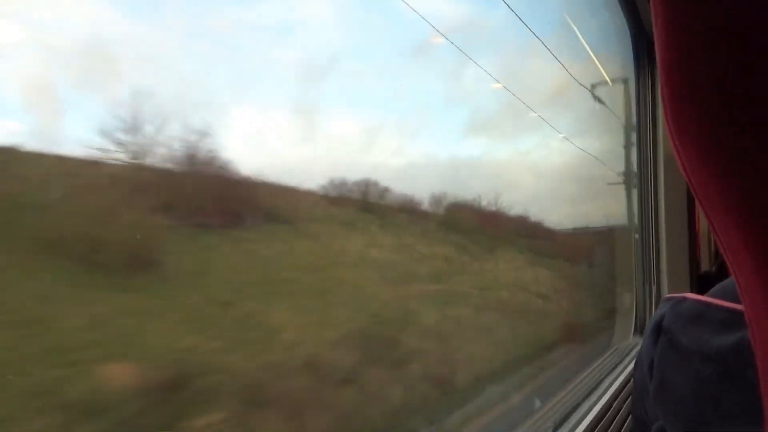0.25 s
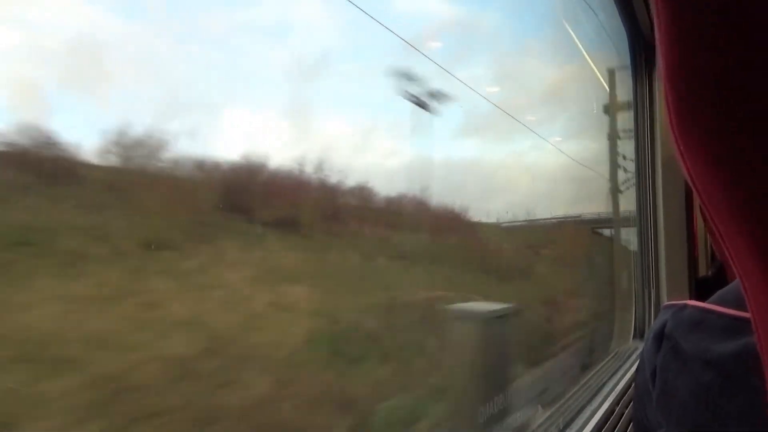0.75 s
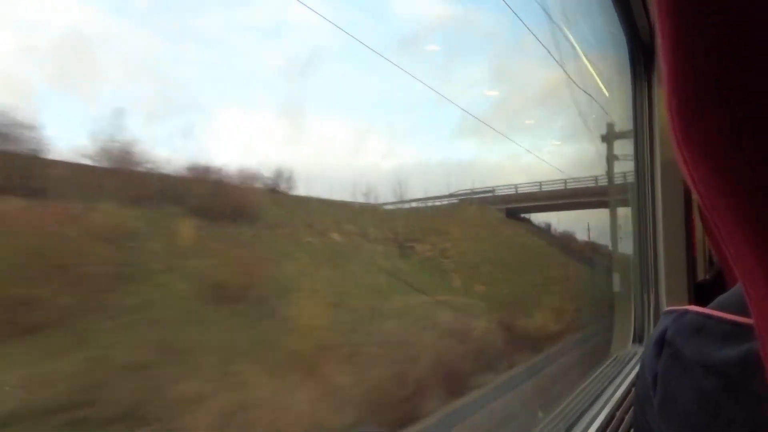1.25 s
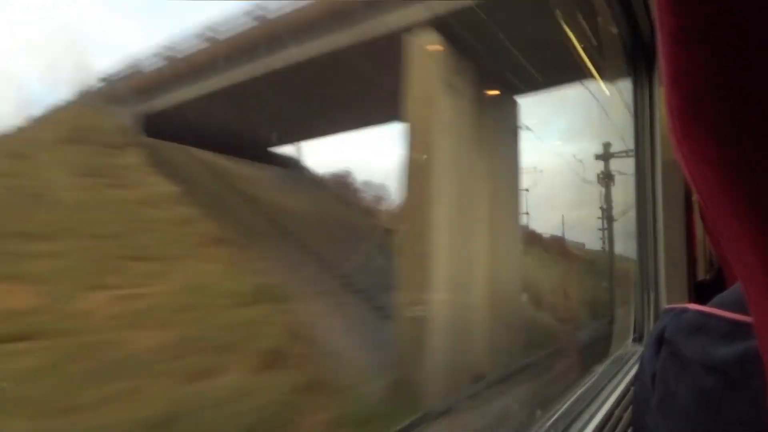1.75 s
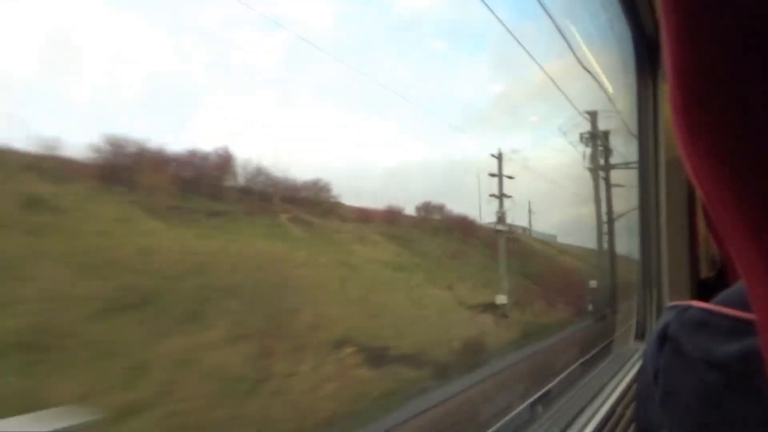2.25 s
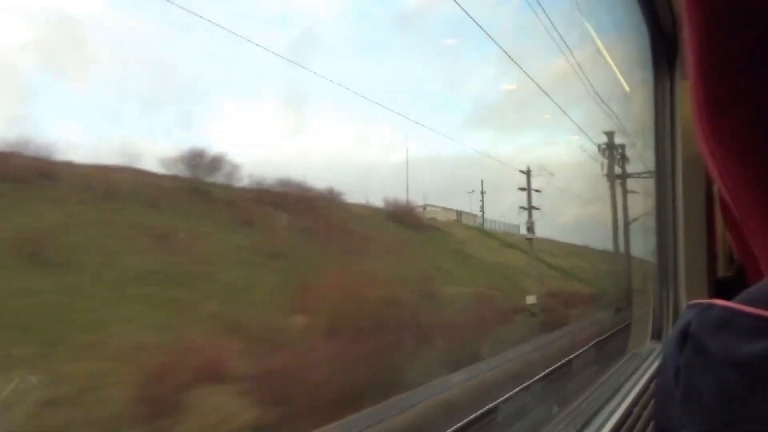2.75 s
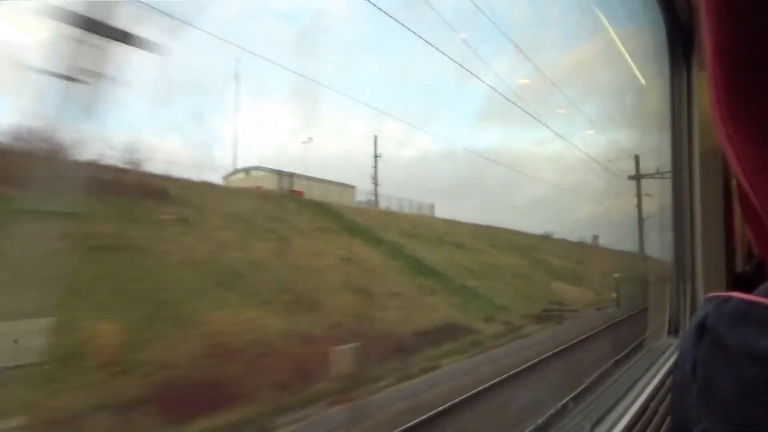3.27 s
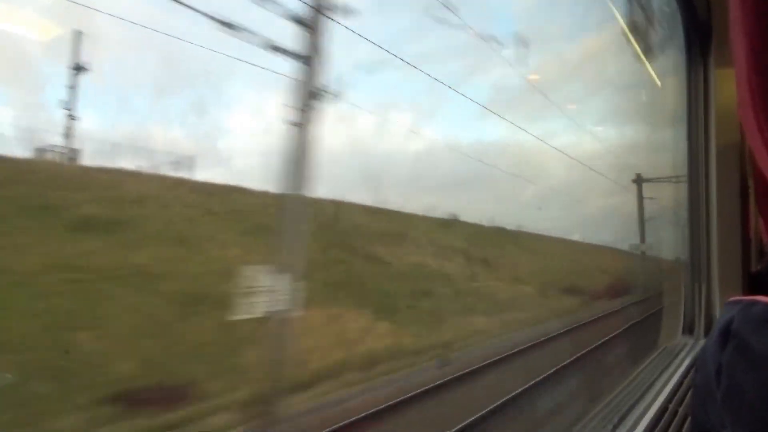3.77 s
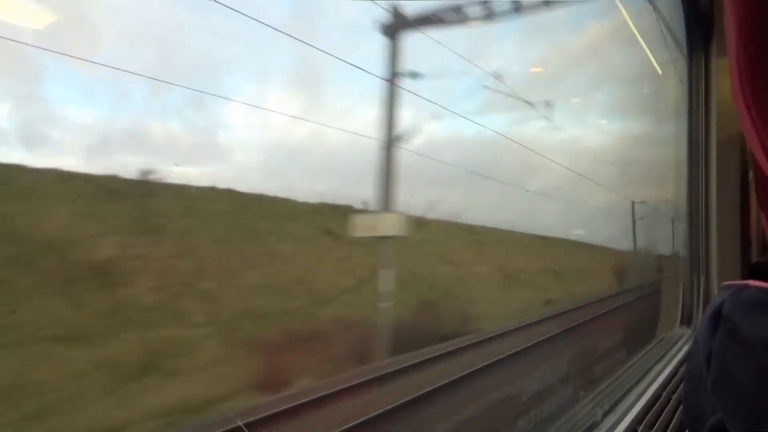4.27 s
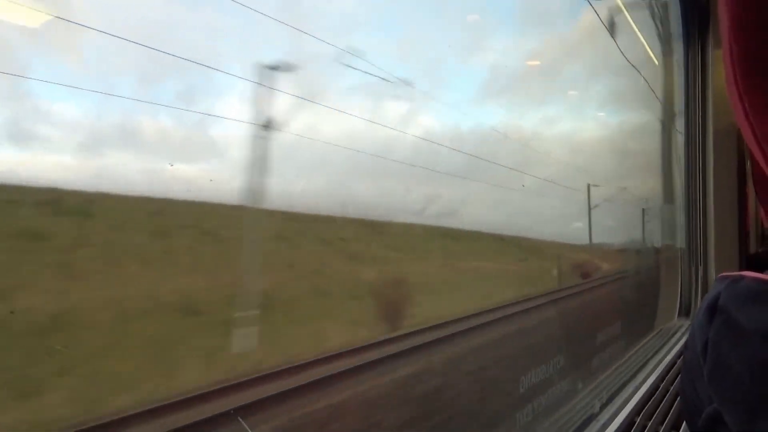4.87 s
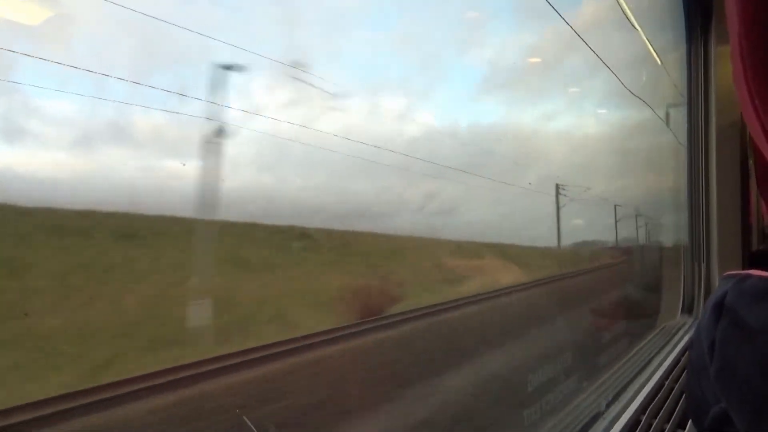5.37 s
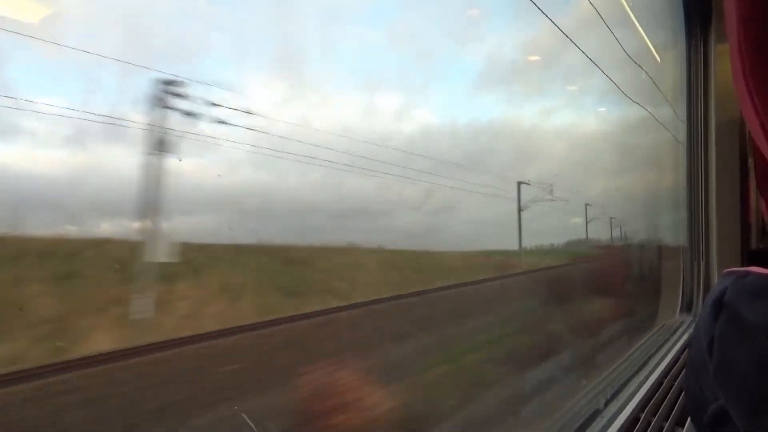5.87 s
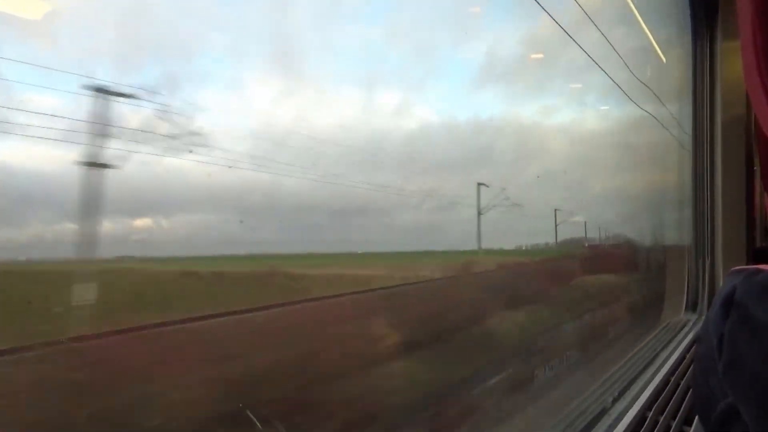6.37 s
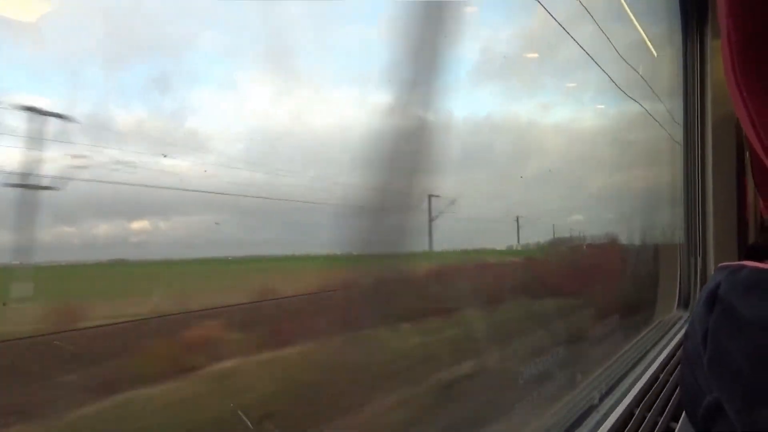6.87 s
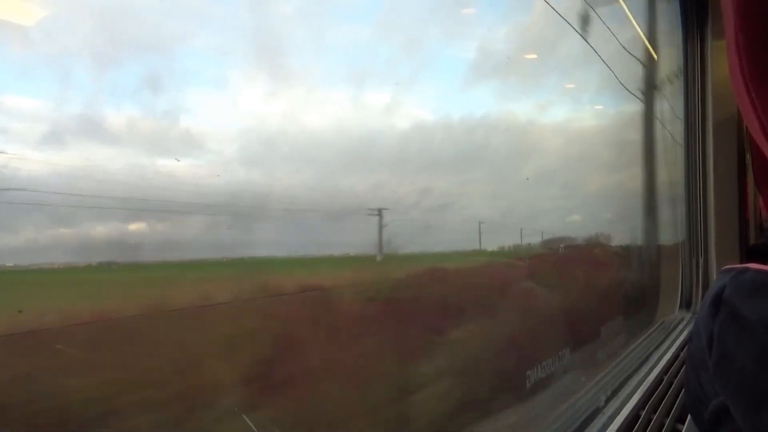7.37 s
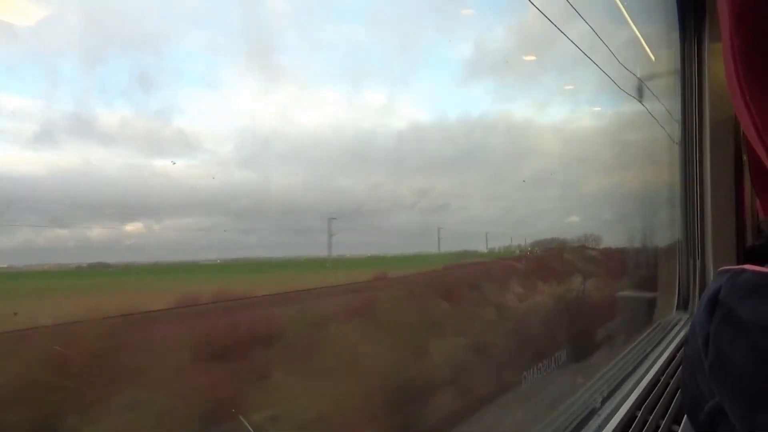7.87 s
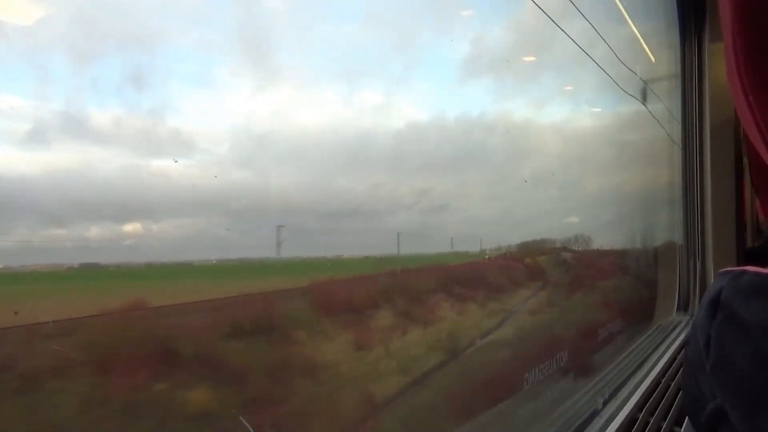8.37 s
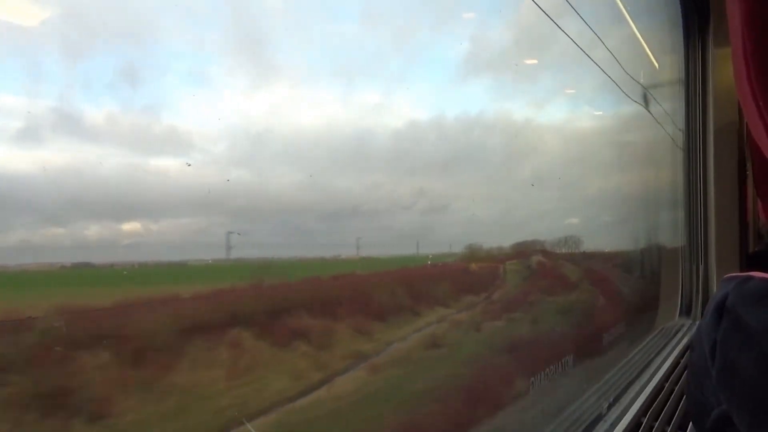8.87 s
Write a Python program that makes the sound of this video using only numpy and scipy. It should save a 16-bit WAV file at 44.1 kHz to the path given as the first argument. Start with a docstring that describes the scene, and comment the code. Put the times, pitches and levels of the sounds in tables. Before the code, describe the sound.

Inside a fast-moving passenger train, a constant low rumble and soft rolling roar continue while nearby fittings tick lightly.

```python
"""A deep, throbbing rumble is heard first: a window seat in a high-speed train at full speed.
Track and airflow force the coach body into vibration, and bumps excite the cabin's resonances.
Rail roughness roars through the floor and rings the wheels; the running gear hums and air hisses.
Plastic fittings tick, knock and slip nearby. Air rushes briefly along the window, a bridge
reflects the rolling noise in hollow moans, and near the end the wheels sing."""
import sys
import numpy as np
from scipy import signal
from scipy.fft import rfft, irfft
from scipy.io import wavfile
from scipy.ndimage import uniform_filter1d

SR = 44100
rng = np.random.default_rng(int(sys.argv[2]) if len(sys.argv) > 2 else 0)


def wav_record(signal):
    """Record a signal, one row per channel, as 16-bit PCM in the file named by sys.argv[1]."""
    frames = np.transpose(np.atleast_2d(signal))
    bounded = np.clip(frames, -1, 1)
    # unit amplitude maps onto the largest positive 16-bit level
    quanta = np.round(bounded * 32767).astype(np.int16)
    wavfile.write(sys.argv[1], SR, quanta)


N = 402633
TIME = np.arange(N) / SR
FREQS = np.fft.rfftfreq(N, 1 / SR)


def undb(db):
    """Amplitude ratio of a level in decibels."""
    return 10 ** (np.asarray(db) / 20)


def unit(x):
    """Normalisation to rms 1."""
    return x / np.sqrt(np.mean(x ** 2))


def along(points, freqs):
    """Interpolation of (frequency, value) points on a log-frequency axis."""
    hz, value = np.transpose(points)
    return np.interp(np.log(freqs + 1), np.log(hz), value)


def colour(points, freqs, modes=()):
    """Magnitude response: a spectral envelope with resonance peaks and 12 dB per octave skirts."""
    skirts = np.minimum(freqs / points[0][0], 1) ** 2 / np.maximum(freqs / points[-1][0], 1) ** 2
    peaks = sum(undb(db) ** 2 / (1 + (2 * (freqs - hz) / width) ** 2) ** 2 for hz, width, db in modes)
    return undb(along(points, freqs)) * skirts * np.sqrt(1 + peaks)


def walk(rate_hz):
    """Slow random modulation: noise low-passed at rate_hz, rms 1."""
    return unit(irfft(rfft(rng.standard_normal(N)) / (1 + (FREQS / rate_hz) ** 2) ** 2, N))


def swell(centre, duration):
    """Gaussian envelope; duration is its full width at half height."""
    return .5 ** ((2 * (TIME - centre) / duration) ** 2)


def add(out, s, sound):
    """Superposition of a sound starting at s seconds."""
    start = int(s * SR)
    out[:, start:start + sound.shape[1]] += sound[:, :N - start]


# likeness of left and right (frequency [Hz], coherence [0-1])
COHERENCE = [(25, 0.92), (60, 0.91), (130, 0.86), (290, 0.67), (640, 0.71), (1410, 0.38), (3100, 0.65),
             (4500, 0.5), (6820, 0.55), (15000, 1)]
# left minus right (frequency [Hz], level difference [dB])
BALANCE = [(60, -2), (200, -1), (380, 0.5), (560, 3), (1290, 1.5), (2200, 3.5), (3200, 2), (15000, -0.5)]
# lead of left over right (frequency [Hz], phase [rad])
PHASE_LEAD = [(20, 0.21), (90, -0.14), (340, -0.73), (860, -0.9), (1460, -0.26), (2150, -0.61),
              (3530, -0.033)]
def cabin_field(gain):
    """Partial coherence: stereo noise arrives from all round, more from the aisle side; rms 1."""
    common, apart = rfft(rng.standard_normal((2, N)))
    alike = np.sqrt(np.clip(along(COHERENCE, FREQS), 0, 1))
    sides = np.array([[1], [-1]])
    spectra = np.sqrt(1 + alike) * common + sides * np.sqrt(1 - alike) * apart
    balance = undb(sides * along(BALANCE, FREQS) / 2)
    lead = np.exp(.5j * sides * along(PHASE_LEAD, FREQS))
    return unit(irfft(spectra * balance * lead * gain, N))


def cabin_tone(hz, phase):
    """Level and phase differences between left and right place a tone in the cabin."""
    left = undb(along(BALANCE, hz)) * np.sin(phase)
    right = np.sin(phase - along(PHASE_LEAD, hz))
    return np.array([left, right])


# rough stretches (centre time [s], duration [s], rumble change [dB], roar change [dB], wheel change [dB])
ROUGH_STRETCHES = [ (0.846, 0.12, -2, 2, -0.5), (1.055, 0.25, 1.5, 5.5, -1), (1.95, 0.25, -0.5, 1.3, 1.5),
                   (2.42, 0.69, 0.5, -0.5, 2), (3.873, 0.3, 0.5, 3, 0), (4.647, 0.58, 1.4, 0, 1.5),
                   (5.103, 0.43, 2, 1.5, 0), (6.46, 0.33, 1.1, 2, 1), (7.095, 0.4, 1, 0, 1.5),
                   (7.718, 0.7, 1.1, 2, 2)]
def ride_levels(rumble_db=-17, roar_db=-34, wheel_db=-40.5):
    """Excitation follows track roughness; the rumble also slowly builds while the roar eases."""
    smooth_track = np.array([rumble_db + 0.1454 * TIME, roar_db - 0.1064 * TIME, np.full(N, wheel_db)])
    changes = sum(np.outer(dbs, swell(s, duration)) for s, duration, *dbs in ROUGH_STRETCHES)
    return smooth_track + changes


# vibration spectrum of the coach body (frequency [Hz], relative level [dB])
BODY_SPECTRUM = [(12, -24), (22, -8.5), (33, -6.5), (50, -8.5), (76, -6.5), (90, -2.5), (115, -3.5),
                 (145, -7.5), (182, -12.5), (225, -13), (290, -20.5), (400, -28), (800, -47.5)]
# resonances of cabin air and panels (frequency [Hz], width [Hz], gain [dB])
CABIN_MODES = [(63.2, 18.3, 8.5), (199.3, 13.7, 5.5), (255, 18, -1)]
def rumble(db):
    """Forced vibration: track and airflow shake the body, and the cabin booms at its resonances."""
    return cabin_field(colour(BODY_SPECTRUM, FREQS, CABIN_MODES)) * undb(db)


# rolling noise through the floor (frequency [Hz], relative level [dB])
ROAR_SPECTRUM = [(200, -20), (350, -0.5), (460, -4), (520, -1), (660, -1.5), (740, -6.5), (900, -11.5),
                 (1050, -12), (1350, -16), (1800, -17.5), (3000, -28.5)]
# radiation of wheels and rails (frequency [Hz], relative level [dB])
WHEEL_SPECTRUM = [(900, -11), (1500, -9.5), (1900, 0.5), (2200, 1), (2550, 2), (2900, -2), (3300, -10),
                  (3600, -9.5), (5000, -19)]
# wheel resonances (frequency [Hz], width [Hz], gain [dB])
WHEEL_RESONANCES = [(1816, 13, 5.5), (2373, 56, 4.5), (2560, 45, 1.5), (2760, 43, 3.5), (3050, 35, -1),
                    (3245, 73, 6.5)]
def rolling(roar_db, wheel_db):
    """Roughness excitation: the same uneven rail modulates the floor's roar and the wheels' ringing."""
    roughness = walk(20)
    roar = cabin_field(colour(ROAR_SPECTRUM, FREQS)) * undb(roar_db + 1.05 * roughness)
    ringing = cabin_field(colour(WHEEL_SPECTRUM, FREQS, WHEEL_RESONANCES))
    return roar + ringing * undb(wheel_db + 1.14 * roughness + .5 * walk(11))


# tones of the running gear (frequency [Hz], rms level [dB])
GEAR_TONES = [(421, -44.5), (562, -47), (588, -44.5), (898, -53)]
def running_gear(waver_db=3.0, drift=0.011, flutter=0.0117):
    """Frequency and amplitude modulation: the gear's faint tones wander in pitch and strength."""
    out = 0
    for hz, db in GEAR_TONES:
        pitch_hz = hz * (1 + drift * walk(5.06) + flutter * walk(44.5))
        tone = cabin_tone(hz, 2 * np.pi * np.cumsum(pitch_hz) / SR)
        out += unit(tone * undb(waver_db * walk(5.7))) * undb(db)
    return out


# air along the skin and from the vents (frequency [Hz], relative level [dB])
AIR_SPECTRUM = [(1500, 3), (3500, 1.5), (4800, 6), (5600, 2.5), (7500, 3), (9000, 1), (10000, -2),
                (11200, -7.5), (13000, -14), (15500, -21)]
def air_hiss(wheel_db, hiss_db=-50, fade_db_per_s=0.29, split_hz=7000, waver_db=1.5):
    """Broadband flow noise slowly eases and follows the wheel level; its treble wavers by itself."""
    lift_db = wheel_db - np.median(wheel_db) - fade_db_per_s * (TIME - TIME.mean())
    hiss = cabin_field(colour(AIR_SPECTRUM, FREQS))
    low = irfft(rfft(hiss) / (1 + (FREQS / split_hz) ** 6), N)
    treble = (hiss - low) * undb(waver_db * walk(15))
    return (low + treble) * undb(hiss_db + lift_db + .5 * walk(21))


# cabin response to track bumps (centre time [s], duration [s], frequency [Hz], level [dB])
BUMP_THROBS = [(.03, .1, 67, -15), (.26, 0.15, 63, -22), (1.03, 0.16, 97, -17.5), (1.08, .08, 66, -19.5),
               (1.35, 0.11, 60, -19), (3.128, 0.096, 92, -14), (3.15, 0.09, 115.2, -20),
               (5.423, 0.33, 59, -16.5), (5.46, 0.058, 203, -23.5), (6.437, .08, 200, -25),
               (6.65, 0.23, 66, -18), (7.44, .12, 60, -18), (7.938, 0.1, 68, -17), (8.07, 0.082, 107, -16),
               (8.65, 0.43, 65, -18.5)]
def throbs(drift=0.0252):
    """Resonance: after a bump a low cabin mode builds and dies away, slightly unsteady in pitch."""
    out = 0
    wander = 1 + drift * walk(9.2)
    for s, duration, hz, db in BUMP_THROBS:
        phase = 2 * np.pi * (np.cumsum(hz * wander) / SR + rng.random())
        out += unit(cabin_tone(hz, phase)) * swell(s, duration) * undb(db)
    return out


def ring(force, gain):
    """Causal response: folding the cepstrum gives the minimum-phase filter with this gain."""
    size = force.shape[-1]
    cepstrum = irfft(np.log(gain + gain.max() * 1e-4), size)
    cepstrum[1:size // 2] *= 2
    cepstrum[size // 2 + 1:] = 0
    return irfft(rfft(force) * np.exp(rfft(cepstrum)), size)


def strike(spectrum, modes, t60, snap_db, spread, tilt_db=0, grain_db=4, size=8192):
    """Impact excitation: a snap, chatter and reflections ring a part; energy of 10 ms at rms 1."""
    t, freqs = np.arange(size) / SR, np.fft.rfftfreq(size, 1 / SR)
    common, apart, grain = rng.standard_normal((3, size))
    # contacts come in clumps about a third of a millisecond long
    contacts = undb(grain_db * unit(uniform_filter1d(grain, size=16))) * undb(-60 * t / t60)
    force = unit(common * contacts) / np.sqrt(size)
    force[0] += undb(snap_db)
    # the click differs left and right lower down; its treble is alike on both sides
    side = ring(unit(apart * contacts) / np.sqrt(size), 1 / (1 + (freqs / 7000) ** 4))
    force = force + spread * np.array([side, -side])
    tilt = undb(tilt_db * np.log2(np.maximum(freqs / 2500, 1)))
    response = ring(force, colour(spectrum, freqs, modes) * tilt)
    return unit(response) * np.sqrt(.01 * SR / size)


# response of the plastic parts (frequency [Hz], relative level [dB])
PLASTIC_SPECTRUM = [(300, -26), (700, 4.5), (1100, 5.5), (2300, 7.5), (4500, 1), (5800, -5), (7200, -2.5),
                    (9000, -0.5), (11000, -8), (13000, -16), (15500, -30)]
# light impacts (time [s], level [dB], mode frequency [Hz], mode width [Hz], mode gain [dB],
# snap over chatter [dB], treble tilt [dB/octave], chatter t60 [s])
PLASTIC_TICKS = [ (.020, -37, 5800, 1400, 14, -6, 2, .09), (.068, -39, 6000, 1400, 11, -10, 1, .06),
                 (.120, -33, 6000, 1400, 13, -8, 0, 0.22), (.900, -34.5, 4200, 900, 5, -14, -1, .046),
                 (1.187, -32.5, 4800, 1000, 14, -5, 4.5, 0.063),
                 (1.251, -34, 9200, 1800, -1, -14, 7.5, 0.086), (1.366, -42, 5500, 1200, 28, 6, -2, .05),
                 (1.425, -45, 5530, 1200, 19, 3, -3, .043), (1.882, -34, 4800, 1400, 5, -1, -2, .03),
                 (2.186, -30.5, 1390, 330, 2, -8, -12, 0.042),
                 (2.5744, -24.5, 6960, 900, -3, -14, 4.5, 0.12), (2.971, -32, 1590, 380, 9, -15, -4, .066),
                 (3.0559, -27.5, 4540, 800, 13, -1, -1.5, .0085),
                 (3.081, -23, 3670, 1800, -1, -11, 2.5, 0.082), (3.464, -36.5, 4200, 1000, 5, -2, -1, .043),
                 (3.985, -52, 9700, 1200, 22, -5, 2, .02), (5.238, -34.5, 4000, 1400, 4, -10, -1.5, 0.039),
                 (5.368, -38.5, 4500, 1400, 3, -8, -1, .036), (5.9225, -22, 7540, 1500, -1, -8, 2.5, .07),
                 (5.929, -25, 2010, 1200, -5, -1, -7, .05), (6.193, -23.5, 2400, 900, 1, -10, -4.5, .06),
                 (6.199, -28.5, 1900, 1400, 0, -7, -6, 0.053), (6.2125, -35, 7500, 2000, 4, -6, -3, 0.023),
                 (6.6787, -32, 8400, 2000, 22, -10, 1, 0.043), (7.598, -23.5, 3450, 600, 7, -8, -8, 0.094),
                 (7.658, -30, 9100, 2200, 2, -6, 0, .059), (7.716, -33, 5200, 1200, 9, -8, -2, .033),
                 (8.242, -39.5, 9000, 2200, 0, -8, 2, 0.044), (8.744, -37.5, 5000, 1500, 0, -8, -1, .03)]
def ticks():
    """Free vibration: each light impact rings a small plastic part at its own resonance."""
    out = np.zeros((2, N))
    for s, db, hz, width, mode_db, snap_db, tilt_db, t60 in PLASTIC_TICKS:
        tick = strike(PLASTIC_SPECTRUM, [(hz, width, mode_db)], t60, snap_db, spread=0.72, tilt_db=tilt_db)
        add(out, s, tick * undb(db))
    return out


# response of the knocked panel (frequency [Hz], relative level [dB])
PANEL_SPECTRUM = [(120, -6), (350, 2.5), (700, -8), (1400, -20.5), (3000, -32), (6000, -30), (10000, -38)]
# its resonances (frequency [Hz], width [Hz], gain [dB])
PANEL_RESONANCES = [(630, 56, 10), (815, 130, 7), (1217, 60, 6), (1610, 70, 9.5)]
# knocks of the fittings (time [s], level [dB], mode frequency [Hz])
PANEL_KNOCKS = [(.386, -19.5, 390), (1.101, -26, 650), (2.183, -25, 520), (2.432, -23.5, 640),
                (2.578, -19.5, 486), (2.711, -27.5, 700), (3.082, -19.5, 525), (6.496, -23.5, 480)]
def knocks():
    """Modal response: each dull knock excites the panel's resonances and a low one of its own."""
    out = np.zeros((2, N))
    for s, db, hz in PANEL_KNOCKS:
        modes = [(hz, 0.19 * hz, 8), *PANEL_RESONANCES]
        add(out, s, strike(PANEL_SPECTRUM, modes, t60=0.11, snap_db=-15, spread=0.38) * undb(db))
    return out


# air rushing past the window (frequency [Hz], relative level [dB])
RUSH_SPECTRUM = [(900, -17), (1900, -5), (2350, 8), (3000, -3), (4000, -12), (8000, -14), (11000, -39)]
# its passage (centre time [s], duration [s], level [dB])
WINDOW_RUSHES = [(0.864, 0.14, -36.5)]
def window_rush(flutter_db=3.0):
    """Constricted flow: air squeezed between train and lineside flutters briefly along the window."""
    envelope = sum(undb(db) * swell(s, duration) for s, duration, db in WINDOW_RUSHES)
    return cabin_field(colour(RUSH_SPECTRUM, FREQS)) * envelope * undb(flutter_db * walk(40))


# slipping plastic joints (time [s], level [dB], start frequency [Hz], fall [octaves/s], t60 [s])
JOINT_SLIPS = [ (1.1875, -33, 3620, 2, .05), (1.2515, -32.5, 3170, 5.7, 0.11),
               (2.5745, -12.5, 1850, 105, 0.021), (5.9227, -16, 3420, 35, 0.036),
               (5.938, -16.5, 3350, 8.8, 0.018), (6.1937, -20, 3370, 25, .025),
               (7.5973, -19, 3770, 30, 0.024)]
def slips(attack_s=0.00076, roughness=.45, size=4096):
    """Damped oscillation: a joint lets go with a slightly rough ping that falls in pitch as it dies."""
    out = np.zeros((2, N))
    t = np.arange(size) / SR
    for s, db, hz, fall, t60 in JOINT_SLIPS:
        chirp = np.sin(2 * np.pi * np.cumsum(hz / 2 ** (fall * t)) / SR)
        envelope = (1 - np.exp(-t / attack_s)) * undb(db - 60 * t / t60)
        rasp = 1 + roughness * unit(uniform_filter1d(rng.standard_normal((2, size)), size=32))
        add(out, s, chirp * rasp * envelope)
    return out


# surges under the bridge and just after (centre time [s], duration [s], frequency [Hz], level [dB])
BRIDGE_SURGES = [(1.808, .05, 556, -32), (1.86, 0.091, 611, -31.5), (1.977, .06, 600, -33),
                 (2.063, 0.034, 575, -32), (2.28, 0.036, 650, -33), (2.446, 0.038, 605, -29)]
def bridge_surges(width_hz=55):
    """Reflection: rolling noise returns off a bridge as short, hollow moans of narrow-band noise."""
    out = 0
    for s, duration, hz, db in BRIDGE_SURGES:
        moan = cabin_field(1 / (1 + (2 * (FREQS - hz) / width_hz) ** 2) ** 2)
        envelope = swell(s, duration)
        local_rms = np.sqrt(np.average(np.mean(moan ** 2, axis=0), weights=envelope ** 2))
        out += moan / local_rms * envelope * undb(db)
    return out


# wheel modes that sing (frequency [Hz], width [Hz], relative level [dB])
SINGING_MODES = [(2520, 66, 5), (2760, 100, -1), (2960, 38, -1.5), (3340, 160, -10), (3970, 260, -16)]
# spells of singing (centre time [s], duration [s], level [dB])
SINGING_SPELLS = [(6.45, .8, -47.5), (6.8, .06, -38), (6.98, .16, -42), (7.113, .09, -37),
                  (7.215, .05, -39), (7.45, 0.3, -44), (7.816, .08, -39), (7.952, 0.11, -40)]
def wheel_singing(flicker_db=2):
    """Lightly damped resonance: sharp wheel modes swell and fade, flickering as the contact changes."""
    gain = sum(undb(db) / (1 + (2 * (FREQS - hz) / width) ** 2) for hz, width, db in SINGING_MODES)
    envelope = sum(undb(db) * swell(s, duration) for s, duration, db in SINGING_SPELLS)
    return cabin_field(gain) * envelope * undb(flicker_db * walk(11))


def scene():
    """Superposition: the pressures of all sources add at the seat."""
    rumble_db, roar_db, wheel_db = ride_levels()
    steady = rumble(rumble_db) + rolling(roar_db, wheel_db) + running_gear() + air_hiss(wheel_db)
    events = throbs() + ticks() + knocks() + window_rush() + slips() + bridge_surges() + wheel_singing()
    return steady + events


def record(dry, cutoff_hz=15800):
    """Band limiting: a steep elliptic low-pass removes the highest treble."""
    return signal.sosfilt(signal.ellip(10, .2, 80, cutoff_hz, fs=SR, output="sos"), dry)


dry = scene()
out = record(dry)
wav_record(out)
```